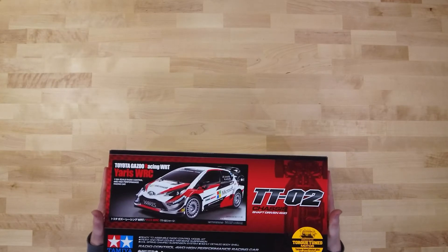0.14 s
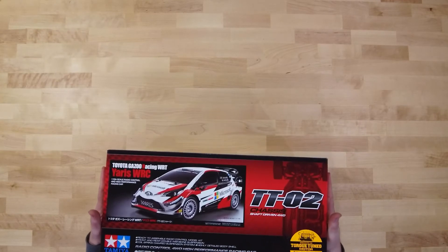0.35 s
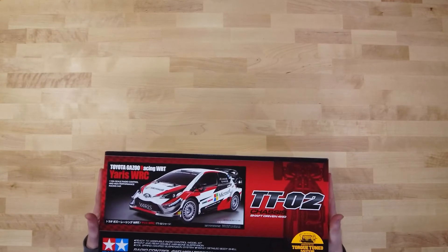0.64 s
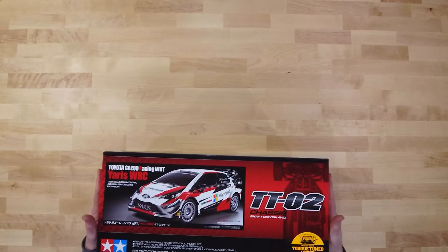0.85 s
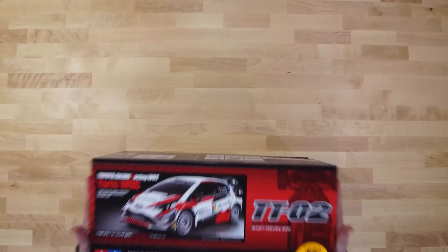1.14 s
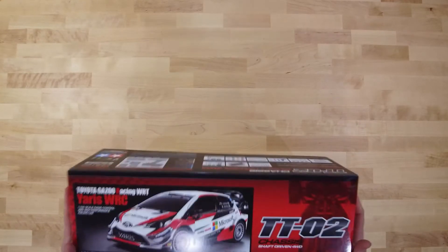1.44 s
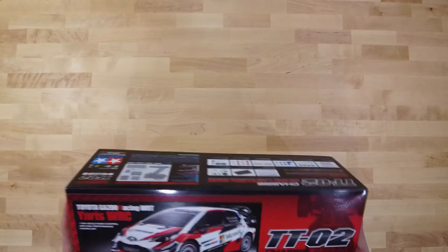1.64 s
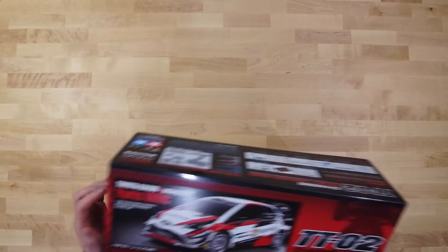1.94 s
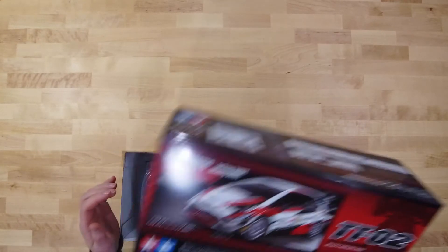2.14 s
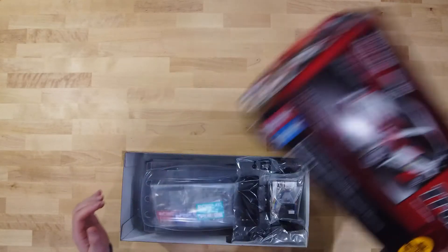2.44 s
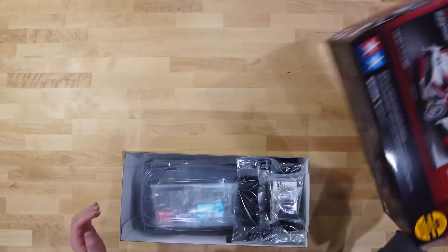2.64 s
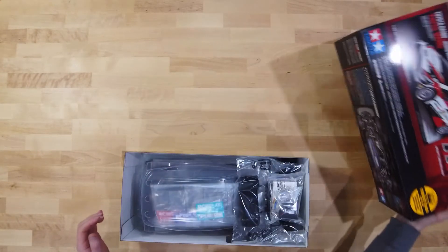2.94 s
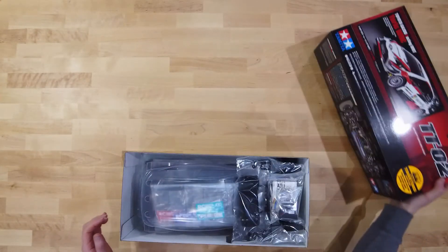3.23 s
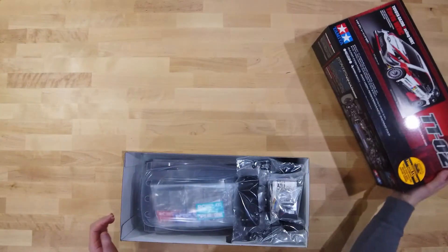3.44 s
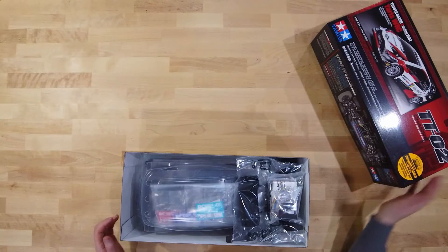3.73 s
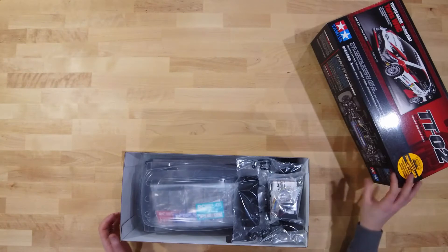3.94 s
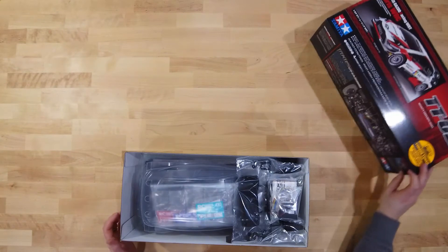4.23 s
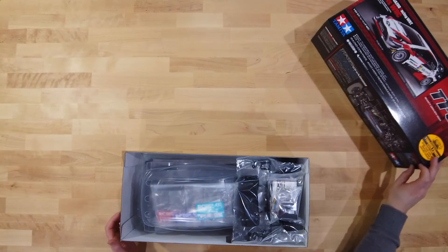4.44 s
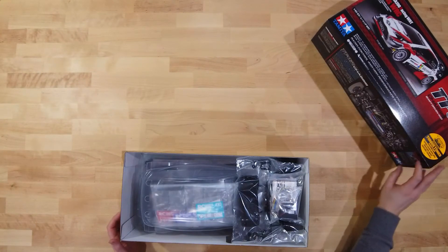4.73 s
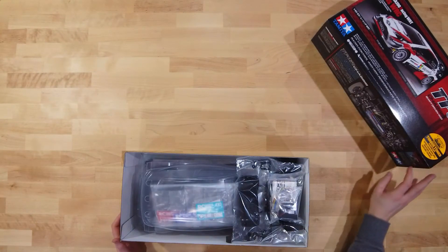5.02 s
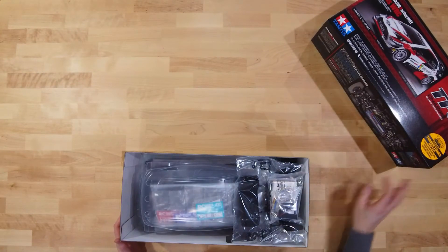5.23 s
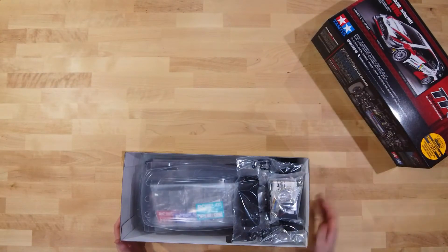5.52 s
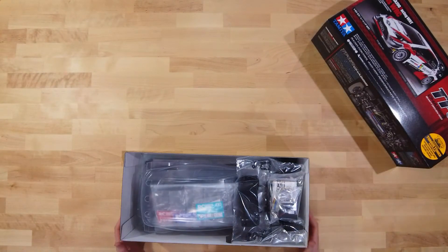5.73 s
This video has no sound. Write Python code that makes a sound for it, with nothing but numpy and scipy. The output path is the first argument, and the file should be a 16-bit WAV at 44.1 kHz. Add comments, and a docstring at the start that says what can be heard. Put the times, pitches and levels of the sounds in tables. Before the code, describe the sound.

A cardboard box lid rubs and scrapes free of its tray, ticks in the hands, then knocks twice on a wooden table and is pushed across it.

```python
"""The deep lid of a cardboard box is drawn up: friction noise on the tray, a scrape as it comes free, then
knocks and a low sway as the tray drops back. The lid ticks in the hands, lands on a wooden table with two
hollow knocks (damped modes excited by a blow) and is pushed across it with hiss, stick-slip and a squeak.
A sleeve brushes by afterwards, as coloured noise. The room is live and small, with quiet air; in stereo."""
import sys
import numpy as np
from scipy import signal
from scipy.fft import rfft, irfft, next_fast_len
from scipy.io import wavfile
from scipy.ndimage import uniform_filter1d

SR = 44100
rng = np.random.default_rng(int(sys.argv[2]) if len(sys.argv) > 2 else 0)


def transcribe(signal):
    """Save signal, clipped to [-1, 1], as a 16-bit WAV file at the path in sys.argv[1]."""
    frames = np.atleast_2d(signal).T
    limited = np.clip(frames, -1, 1)
    pcm = np.round(limited * 32767).astype(np.int16)
    wavfile.write(sys.argv[1], SR, pcm)


N = 258426
TIME = np.arange(N) / SR

# Crack of a contact. Each row: frequency in Hz, relative level in dB, 60 dB decay time in seconds.
CRACK_DECAY = [(300, -5.5, 0.03), (1800, 3, 0.074), (3100, -5.5, 0.081), (4970, -9, 0.04),
               (7000, -16, 0.034), (15000, -20.5, 0.014)]


def from_db(db):
    """Logarithmic level: decibels become an amplitude gain."""
    return 10 ** (np.asarray(db) / 20)


def rms_one(x):
    """Normalization: scale to unit root mean square."""
    return x / np.sqrt(np.mean(x ** 2) + 1e-20)


def pan(db):
    """Intensity stereo: left and right gains for a level difference, positive to the left."""
    return from_db(np.array([[db], [-db]]) / 2)


def at_hz(rows, hz, column=1):
    """Spectral envelope: interpolate a table column along log frequency."""
    rows = np.array(rows)
    return np.interp(np.log(hz + 1e-3), np.log(rows[:, 0]), rows[:, column])


def drift(rate):
    """Random modulation: straight lines between normal deviates drawn `rate` times a second."""
    return np.interp(TIME * rate, np.arange(N // 8), rng.standard_normal(N // 8))


def add(out, s, sound):
    """Superposition: mix a short stereo sound in at time s."""
    start = round(s * SR)
    out[:, start:start + sound.shape[1]] += sound[:, :N - start]


def turning(hz):
    """Phase is the running integral of a changing frequency."""
    return 2 * np.pi * np.cumsum(hz) / SR


def stroke(s, attack_s, hold_s, db, release_s):
    """Exponential envelope, full from s on; attack and release are each the time for a factor of ten."""
    before = np.maximum(s - TIME, 0) / max(attack_s, 1e-3)
    after = np.maximum(TIME - s - hold_s, 0) / max(release_s, 1e-3)
    return from_db(db) * 10 ** -np.minimum(before + after, 10)


def strokes(rows, release_s):
    """Incoherent addition: the envelopes of several movements sum in power."""
    return np.sqrt(sum(stroke(*row, release_s) ** 2 for row in rows))


def stereo_spectrum(pair, colour, size, side_db=0):
    """Partial coherence: two unrelated noises, coloured, are blended as middle and side."""
    # Each row: frequency in Hz, left-right correlation before the side gain.
    likeness = [(40, 0.17), (130, 0.98), (280, 0.5), (480, 0.75), (1100, .87), (3000, 0.68), (7000, .3),
                (15000, 0.72)]
    hz = np.arange(size // 2 + 1) * SR / size
    mid, side = rfft(pair, size) * from_db(at_hz(colour, hz))
    alike = np.clip(at_hz(likeness, hz), -.95, .95)
    middle_part = np.sqrt(1 + alike) * mid
    side_part = from_db(side_db) * np.sqrt(1 - alike) * side
    return hz, middle_part + side_part * [[1], [-1]]


def friction(colour, grain_db=0, grains_per_s=1000, side_db=0):
    """Friction noise: countless tiny slips of uneven size, coloured by the surface; rms 1."""
    slips = rng.standard_normal((2, N)) * from_db(grain_db * drift(grains_per_s))
    size = next_fast_len(N, True)
    spectrum = stereo_spectrum(slips, colour, size, side_db)[1]
    return rms_one(irfft(spectrum, size)[:, :N])


def dying_noise(table, size=24000, count=18):
    """High modal density: crowded modes act as noise, each band dying at its own rate; unit mean energy."""
    hz, spectrum = stereo_spectrum(rng.standard_normal((2, size)), table, size)
    centres = np.geomspace(40, 16000, count)
    t = np.arange(size) / SR
    out = 0
    for centre, share in zip(centres, np.eye(count)):
        band = irfft(spectrum * np.interp(hz, centres, share), size)
        out = out + band * from_db(-60 * t / at_hz(table, centre, column=2))
    return rms_one(out) / np.sqrt(size)


def resonate(x, hz, width_hz):
    """Damped resonance: a two-pole filter with gain near 1 at its peak."""
    r = np.exp(-np.pi * width_hz / SR)
    feedback = [1, -2 * r * np.cos(2 * np.pi * hz / SR), r * r]
    return signal.lfilter((1 - r * r) / 2 * np.array([1, 0, -1]), feedback, x)


def room_air(level_db=-61.5):
    """Ambient noise: steady broadband noise falling with frequency."""
    # Each row: frequency in Hz, relative level in dB.
    floor_colour = [(20, -1.5), (50, -15.5), (62, -11), (90, -20.5), (150, -23.5), (220, -23), (330, -24),
                    (500, -30), (1000, -33.5), (2600, -40), (5600, -45), (12000, -48), (16000, -53)]
    return from_db(level_db) * friction(floor_colour, side_db=4.5) * pan(-2.7)


def room(x, wet_db, delay_s=0.0049, build_s=0.003, side_db=-3):
    """Reverberation: late wall reflections thicken into a tail, much alike in the two close capsules."""
    # Each row: frequency in Hz, relative level in dB, 60 dB decay time in seconds.
    room_decay = [(60, 1, 0.87), (134, 1, 0.4), (293, -1.5, .46), (695, -0.5, 0.52), (1170, -2.5, 0.42),
                  (1800, -1, 0.62), (4500, -3.5, .43), (8080, -4, 0.52), (15000, -9.5, 0.24)]
    tail = dying_noise(room_decay, size=30000)
    centre = tail.mean(axis=0)
    tail = centre + from_db(side_db) * (tail - centre)
    since_arrival = np.maximum(np.arange(tail.shape[1]) / SR - delay_s, 0)
    onset = 1 - np.exp(-since_arrival / build_s)
    return x + from_db(wet_db) * signal.fftconvolve(x, tail * onset, axes=1)[:, :N]


def handling(flex_trim_db=-4, sway_trim_db=-2.0, brush_trim_db=3):
    """Plate bending: gripped panels flex and sway in the deep bass; skin and cloth brush by as noise."""
    # Hands bear on the big panels.
    # Each row: start in seconds, attack in seconds, hold in seconds, level in dB before the trim.
    grips = [(.01, 0.06, 0.11, -39.5), (.25, 0.24, 0.53, -49.5), (1.08, 0.8, 0.048, -55),
             (1.228, 0.013, 0.055, -32.5), (1.68, .2, .28, -46.5), (2.05, 0.23, 0.16, -50),
             (2.46, 0.11, .06, -54.5), (3.02, 0.097, .2, -65), (4.16, 0.057, 0.38, -49.5)]
    # Fingers and sleeve. Each row: as for the grips.
    brushes = [(1.8, 0.041, .06, -70.5), (1.96, 0.067, .2, -80), (5.32, 0.22, 0.18, -75.5)]
    # A jolted panel pumps air.
    # Each row: start in seconds, frequency in Hz, level in dB before the trim, 60 dB decay in seconds.
    sways = [(1.225, 29, -38.5, .4), (1.418, 27.9, -29.5, 0.87), (1.945, 26, -39, 0.42),
             (3.436, 30, -32, 0.78), (3.752, 33.9, -29.5, 0.72)]
    # Colours of flexing and brushing. Each row: frequency in Hz, relative level in dB.
    flex_colour = [(12, -9), (26, 3.5), (38, 6), (62, -18.5), (95, -20.5), (160, -20.5), (300, -56.5)]
    brush_colour = [(120, -50), (200, -22), (334, 5), (465, -43), (529, -21), (1530, -13.5), (1710, -29),
                    (1940, -11), (2510, -23), (4430, -13), (12200, -22), (16000, -21)]
    low = from_db(flex_trim_db) * strokes(grips, release_s=0.34) * friction(flex_colour) * pan(-.5)
    t = TIME[:SR]
    for s, hz, db, t60 in sways:
        decay = from_db(sway_trim_db + db - 60 * t / t60)
        add(low, s, decay * np.sin(2 * np.pi * hz * t) * pan(-2))
    brush = from_db(brush_trim_db) * strokes(brushes, release_s=.07) * friction(brush_colour, grain_db=2.5)
    return low + brush * pan(1.9)


def ticks(trim_db=13, snap_db=-4, pitch_db=4, width_hz=260, click_db=-4, click_s=0.0017, grip_s=0.032, count=6):
    """Impulse response of card: a dry click, then a ring at one favoured pitch that the fingers damp."""
    # Each row: start in seconds, level in dB before the trim, favoured pitch in Hz.
    set_ticks = [(1.62, -43, 870), (1.631, -42, 875), (1.688, -38, 1070), (1.775, -43, 420),
                 (1.802, -39.5, 820), (1.847, -40.5, 870), (1.9648, -37, 1860), (2.043, -45.5, 940),
                 (2.096, -43, 394), (2.124, -49, 1000), (2.177, -49, 870), (2.533, -53, 402),
                 (4.163, -39, 412), (4.487, -33, 574)]
    # Each row: frequency in Hz, relative level in dB, 60 dB decay in seconds before the fingers damp it.
    tick_ring = [(152, 2, 0.041), (405, 2, 0.085), (970, -10, 0.12), (2200, -14.5, 0.12),
                 (4920, -16, 0.088), (6960, -31, 0.057), (15000, -28, .02)]
    # fainter ticks come at random while the fingers shift their grip
    from_s, to_s, faint_db, faint_hz = 1.6, 2.19, -49.5, 700
    faint = []
    for when, force, pitch in rng.random((count, 3)):
        s = from_s + when * (to_s - from_s)
        # levels spread over 6 dB, pitches over two octaves
        faint.append((s, faint_db + 6 * (force - .5), faint_hz * 2 ** (2 * pitch - 1)))
    out = np.zeros((2, N))
    for s, db, hz in set_ticks + faint:
        snap = dying_noise(tick_ring, size=4000)
        t = TIME[:snap.shape[1]]
        click = dying_noise(CRACK_DECAY, size=4000) * np.exp(-t / click_s)
        snap = snap * np.exp(-t / grip_s) + from_db(click_db) * click
        ring = resonate(snap, hz, width_hz)
        add(out, s, from_db(db + trim_db) * (from_db(snap_db) * snap + from_db(pitch_db) * ring))
    return out


def judder(jitter=0.082, flutter_db=2.5, octave_db=-22, bend_s=.135):
    """Stick-slip oscillation: in each burst the slip rate and level swell and fall with the pressure."""
    # Each row: middle in seconds, length in seconds, slips per second in the middle, level in dB.
    bursts = [(4.248, 0.19, 335, -46.5), (4.376, .09, 284, -51), (4.44, 0.063, 303, -46.5),
              (4.509, 0.04, 258, -51)]
    out = 0
    for s, length_s, per_s, db in bursts:
        # the slip rate falls to nothing bend_s away from the middle
        arch = np.maximum(1 - ((TIME - s) / bend_s) ** 2, 0)
        phase = turning(per_s * arch * (1 + jitter * drift(150)))
        swell = np.cos(np.pi * np.clip((TIME - s) / length_s, -.5, .5))
        wave = np.sin(phase) + from_db(octave_db) * np.sin(2 * phase)
        out = out + from_db(db) * swell * np.sqrt(2) * wave
    return out * from_db(flutter_db * drift(61))


def lid_on_table(hiss_trim_db=3, drag_trim_db=-1, coarse_db=-4, squeak_jitter=.04):
    """Sliding friction: the edge hisses on the wood, sings through wall resonances, judders and squeaks."""
    # Pushes over the table.
    # Each row: start in seconds, attack in seconds, hold in seconds, level in dB before the trim.
    pushes = [(3.524, 0.036, 0.039, -51.5), (3.728, .11, .012, -55), (4.02, .1, 0.025, -76),
              (4.204, 0.03, 0.062, -54), (4.4, 0.1, 0.008, -55), (4.49, 0.15, 0.029, -54.5),
              (4.58, .1, 0.12, -64)]
    # The rim drags, catches and digs in before it stops. Each row: as for the pushes.
    drags = [(4.23, 0.11, 0.291, -55), (4.497, 0.036, 0.0055, -44.5), (4.56, 0.17, 0.17, -52)]
    # Colours of the hiss and of the coarse slips. Each row: frequency in Hz, relative level in dB.
    slide_colour = [(100, -22), (250, -4), (700, -3.5), (1400, 2.5), (2050, -2), (2400, -4), (3500, -1.5),
                    (5200, -5.5), (6200, -9.5), (9000, -8), (12000, -13.5), (16000, -21)]
    drag_colour = [(100, 9), (300, 0.5), (1000, -4.5), (2100, -1.5), (2500, -6.5), (5200, -6),
                   (6300, -24.5), (16000, -50)]
    # Resonances of the lid's walls. Each row: frequency in Hz, width in Hz, relative level in dB.
    wall_modes = [(340, 84, 2.5), (488, 23, -1), (790, 14, 0.5), (1183, 150, -8), (1655, 46, -3),
                  (2020, 170, -18)]
    drag_release_s = 0.061
    hiss = friction(slide_colour, grain_db=2.0, grains_per_s=4400)
    hiss = from_db(hiss_trim_db) * strokes(pushes, release_s=.085) * hiss
    slips = friction(drag_colour, grain_db=0.5, grains_per_s=420)
    walls = rms_one(sum(from_db(db) * resonate(slips, hz, width) for hz, width, db in wall_modes))
    drag = from_db(drag_trim_db) * strokes(drags, drag_release_s) * (walls + from_db(coarse_db) * slips)
    # after the catch the rim squeaks thinly, sagging as the lid slows
    squeak_s, squeak_hold_s, squeak_start_hz, sag_hz_per_s, squeak_db = 4.5, 0.243, 817, 150, -58.5
    squeak_hz = squeak_start_hz - sag_hz_per_s * (TIME - squeak_s)
    squeak_hz = squeak_hz * (1 + squeak_jitter * drift(300))
    squeak = stroke(squeak_s, 0.029, squeak_hold_s, squeak_db, drag_release_s) * np.sin(turning(squeak_hz))
    squeak = squeak * from_db(3 * drift(70))
    return hiss * pan(-2.5) + drag * pan(-7.0) + (judder() + squeak) * pan(-6.0)


def lid_on_tray(hiss_trim_db=-1, rasp_db=-63, rasp_changes_per_s=800, scrape_trim_db=-1):
    """Speed-dependent friction: rubbing grows louder and brighter, then coarse slips as the rim lets go."""
    # Short tugs ease the lid up.
    # Each row: start in seconds, attack in seconds, hold in seconds, hiss level in dB before the trim.
    tugs = [(.036, 0.039, .02, -54.5), (.24, 0.13, .04, -60), (.39, 0.052, .015, -56),
            (.525, 0.12, .03, -53), (.7, .08, .12, -66.5), (.92, 0.14, .03, -61)]
    # The rim scrapes free, then grazes the tray once more.
    # Each row: start in seconds, attack in seconds, hold in seconds, level in dB before the trim.
    scrapes = [(1.221, .006, 0.07, -23), (1.339, 0.015, 0.0068, -29.5)]
    # Colours of rumble, hiss and scrape. Each row: frequency in Hz, relative level in dB.
    rub_body = [(60, -19.5), (110, -4.5), (160, 4), (290, 0.5), (470, 1.5), (620, -7.5), (850, 0),
                (1130, -1.5), (1400, -5.5), (1800, -4), (2250, -21), (3300, -32.5)]
    rub_hiss = [(1180, -35.5), (2000, -2), (2240, -5.5), (2860, -3), (4120, -5), (5390, -8), (7000, -16.5),
                (8630, -15), (12700, -20), (15200, -26), (16000, -36.5)]
    scrape_colour = [(40, -11), (90, -8.5), (150, -3), (220, 0), (285, -7), (385, 1.5), (620, -13),
                     (860, -4.5), (1150, -11.5), (1700, -15.5), (2400, -21.5), (4500, -29.5), (7000, -38.5),
                     (12500, -39.5), (16000, -47)]
    scrape_release_s = 0.044
    # under the tugs a steady pull gathers speed until the lid comes free
    free_s, pull_db, pull_rise_db_per_s = 1.215, -54, 22
    # the walls' rumble grows more slowly than the hiss: level at full pull, dB per dB of hiss
    rumble_db, rumble_follows = -51, 0.61
    to_go = np.maximum(free_s - TIME, 0)
    pull = from_db(pull_db - pull_rise_db_per_s * to_go)
    speed = np.hypot(pull, strokes(tugs, release_s=0.11)) * (TIME < free_s)
    rumble = from_db(rumble_db) * (speed / from_db(pull_db)) ** rumble_follows
    body = rumble * friction(rub_body, grain_db=1.5, grains_per_s=180, side_db=-5)
    hiss = friction(rub_hiss, grain_db=1.35, grains_per_s=1300, side_db=-5.5)
    hiss = from_db(hiss_trim_db) * speed * hiss
    # in the last stretch the card's grain rasps past the rim, rising in pitch as the lid speeds up
    rasp_s, rasp_end_hz, rasp_octaves_per_s = 0.11, 4400, 3.3
    rasp_hz = rasp_end_hz * 2 ** (-rasp_octaves_per_s * to_go)
    ridges = drift(rasp_changes_per_s) * np.sin(turning(rasp_hz))
    rasp = stroke(free_s - rasp_s, .12, rasp_s, rasp_db, scrape_release_s) * rms_one(ridges)
    scrape = friction(scrape_colour, grain_db=3, grains_per_s=400, side_db=-5.5)
    scrape = from_db(scrape_trim_db) * strokes(scrapes, scrape_release_s) * scrape
    return (body + hiss + rasp) * pan(-.4) + scrape * pan(2.0)


def blows(count=3):
    """Repeated impact: single knocks, and landings whose rebounds come after growing gaps, weaker and duller."""
    # Each row: start in seconds, relative level in dB, contact brightness in Hz, place along the panel.
    single_knocks = [(1.219, -31.5, 1300, 0.8), (1.251, -23.5, 1250, 0.35), (1.2903, -21, 590, 0.55),
                     (1.35, -37, 895, 0.6), (1.374, -34, 1930, 1), (1.389, -30, 234, 0.59),
                     (3.434, -12.5, 554, .01), (3.4883, -16.5, 800, .54), (3.72, -29, 357, 0.75),
                     (3.817, -10.5, 380, 0.69), (3.828, -16, 780, 0.5)]
    # The rim lands flat on the table.
    # Each row: start in seconds, relative level in dB, contact brightness in Hz, place along the panel,
    # gap to the first rebound in seconds, shift of place per rebound.
    landings = [(3.4445, -7.5, 1150, 0.2, .0067, .15), (3.7498, -9.5, 1741, .55, .0045, .08)]
    gap_stretch, loss_db, dulling = 1.9, 2.5, 0.74
    rows = list(single_knocks)
    for s, db, hz, place, gap_s, shift in landings:
        for k in range(count):
            rows.append((s, db - k * loss_db, hz * dulling ** k, place + k * shift))
            s = s + gap_s * gap_stretch ** k
    return rows


def lid_ring(place, t, node_depth=0.56, mode_spacing_hz=110, stiffening=0.032, spread_s=0.0017):
    """Modal superposition: where the lid rests sets its modes' strengths and shifts their pitch a little."""
    # Low modes push air one way and pull it the other.
    # Each row: frequency in Hz before the shift, relative level in dB, 60 dB decay time in seconds,
    # left-right level difference in dB, lead of the left in radians.
    lid_modes = [(74.1, -24.5, 0.37, -8.5, 3), (137.6, -26, 1, -4, 3), (173, -19.5, .2, 0, -1),
                 (215.7, -3, 0.13, -10, -2), (268, -2, 0.1, -8.5, 0.5), (294.5, -5.5, 0.11, -2.5, 3),
                 (333, 1, 0.11, 1.5, 1.0), (395.3, -10.5, 0.22, -7, -2), (423.5, -6.5, 0.14, -1.5, 1.13),
                 (471, -13, 0.082, -3.5, 0.5), (510, -2.5, 0.14, -3, 1.1), (620, -8, 0.088, -1, -1),
                 (717, -13.5, 0.11, 0, -0.65), (813, -17.5, 0.34, 0.5, 1.5), (873, -3.5, 0.093, -3.5, 1.5),
                 (889, -9, 0.079, 3, 2.5), (970, -7, 0.1, -0.5, 0), (1102, -6, 0.12, 0, -0.5),
                 (1144, -11.5, 0.12, 0.5, -0.5), (1387, -13, 0.11, -2.5, 2.5),
                 (1420, -12.5, 0.21, -3.5, -1), (1620, -15, 0.067, 2.5, 0.7),
                 (1980, -10.5, 0.12, -3.5, 3.3), (1900, -17, .06, -5, 4.5), (2511, -22.5, 0.11, -4.5, 3.45),
                 (2520, -21, 0.1, -1.5, -2.5), (3191, -22.5, .12, -2, -0.7)]
    hz, mode_db, t60, side_db, lead = np.transpose(lid_modes)[:, :, None]
    # neighbouring modes start in opposite directions
    direction = (-1) ** np.arange(len(lid_modes))[:, None]
    shape = (1 + node_depth * np.cos(np.pi * place * hz / mode_spacing_hz)) * direction
    decay = shape * from_db(mode_db - 60 * t / t60)
    phase = 2 * np.pi * hz * (1 + stiffening * (place - .35)) * t
    ears = []
    for ear in (1, -1):
        modes = decay * from_db(ear * side_db / 2) * np.sin(phase + ear * lead / 2)
        ears.append(modes.sum(axis=0))
    # the bending wave takes a moment to fill the panel
    return np.array(ears) * (1 - np.exp(-t / spread_s))


def knocks(ring_db=-4, panel_db=19, crack_db=17, crack_brightness=5, corner_db=-1, corner_hz=1900,
           corner_t60=0.023, size=16000):
    """Impact excitation: a blow rings the lid and cracks at the contact; a soft contact leaves out the highs."""
    # Crowded, quickly damped panel modes.
    # Each row: frequency in Hz, relative level in dB, 60 dB decay time in seconds.
    panel_decay = [(40, -8.5, 0.5), (120, -2, 0.057), (299.8, -3.5, 0.18), (600, 1.5, 0.051),
                   (1002, 11.5, 0.029), (1880, -3.5, 0.054), (4000, -18, .06), (15000, -34.5, .04)]
    # Stereo place of the lid. Each row: time in seconds, left-right level difference in dB.
    lid_place = [(1.4, -2), (3.4, -0.5), (3.9, -0.5)]
    # harder contacts crack more: level at a brightness of 1 kHz, and its rise with brightness
    sharp_1khz_db, sharp_db_per_octave = -13, 10.5
    out = np.zeros((2, N))
    t = np.arange(size) / SR
    # a hard contact also snaps the stiff folded corner
    corner = from_db(corner_db - 60 * t / corner_t60) * np.sin(2 * np.pi * corner_hz * t)
    for s, db, contact_hz, place in blows():
        sharp_db = sharp_1khz_db + sharp_db_per_octave * np.log2(contact_hz / 1000)
        gain = from_db(db) * pan(np.interp(s, *np.transpose(lid_place)))
        panel = from_db(panel_db) * dying_noise(panel_decay, size=size) * pan(-2.5)
        body = from_db(ring_db) * lid_ring(place, t) + panel
        soften_body = signal.butter(2, min(contact_hz, SR / 4), fs=SR, output="sos")
        body = signal.sosfilt(soften_body, body)
        add(out, s, gain * (body + from_db(sharp_db) * corner * pan(-2.0)))
        soften_crack = signal.butter(1, min(crack_brightness * contact_hz, SR / 3), fs=SR, output="sos")
        crack = signal.sosfilt(soften_crack, dying_noise(CRACK_DECAY, size=3000))
        add(out, s, gain * from_db(sharp_db + crack_db) * crack * pan(-1.8))
    return out


def scene():
    """Superposition of sources: the box and its ticks reverberate by different shares; handling and air are dry."""
    box = knocks() + lid_on_tray() + lid_on_table()
    return room(box, wet_db=-13.0) + room(ticks(), wet_db=-10.0) + handling() + room_air()


def record(dry, threshold_db=-9, release_db_per_s=1200, cutoff_hz=15900):
    """Peak limiting: a fast limiter in each channel holds the knocks down; then a low-pass cuts the top."""
    over = np.maximum(20 * np.log10(np.abs(dry) + 1e-9) - threshold_db, 0)
    # the gain reduction rises at once and falls at a steady rate
    fall = release_db_per_s * TIME
    held = np.maximum.accumulate(over + fall, axis=1) - fall
    limited = dry * from_db(-uniform_filter1d(held, size=8))
    return signal.sosfilt(signal.ellip(10, .1, 80, cutoff_hz, fs=SR, output="sos"), limited)


dry = scene()
out = record(dry)
transcribe(out)
```